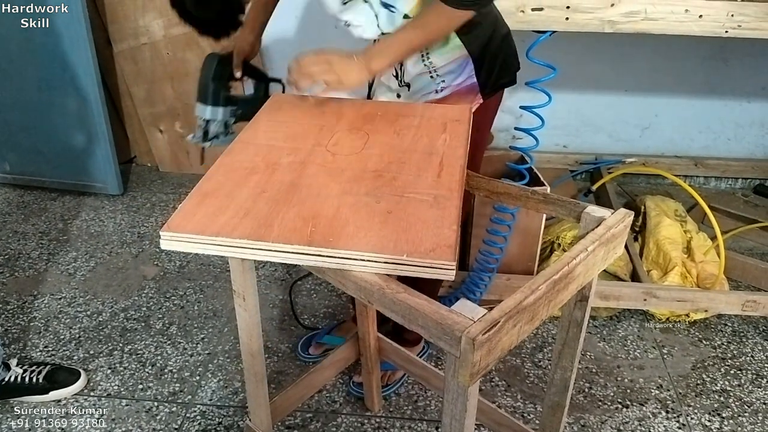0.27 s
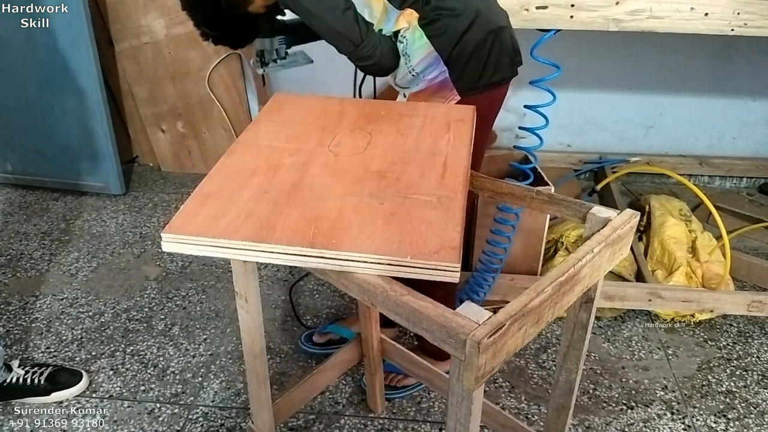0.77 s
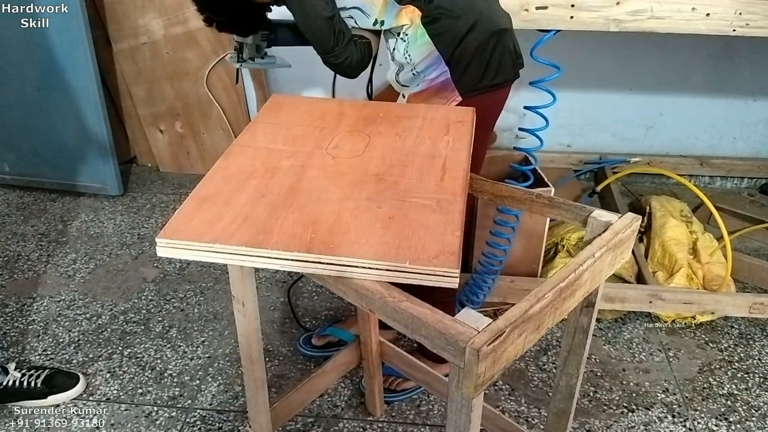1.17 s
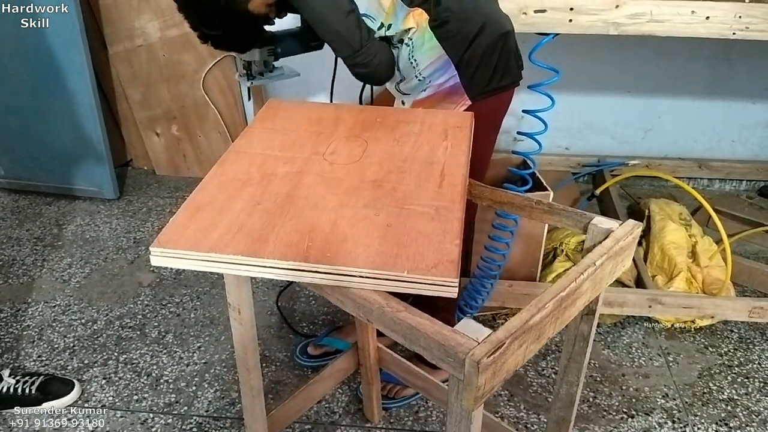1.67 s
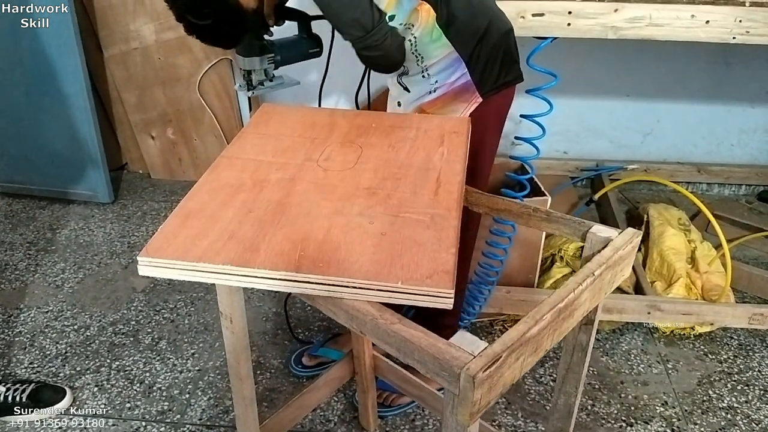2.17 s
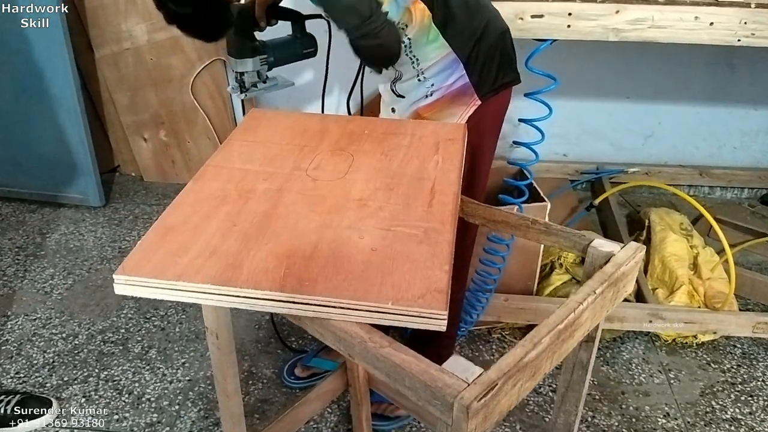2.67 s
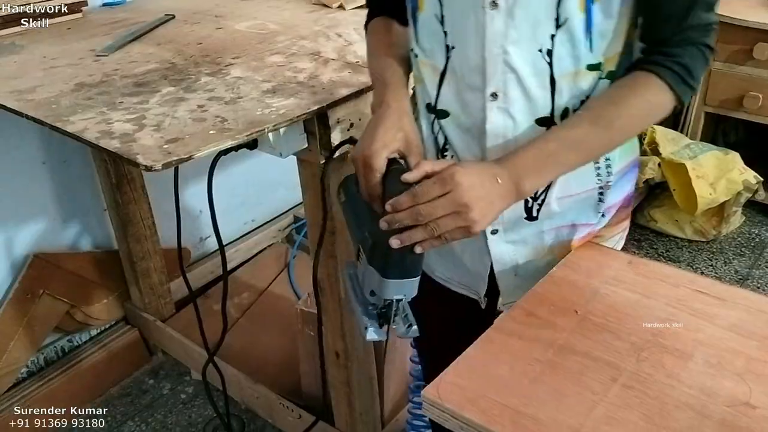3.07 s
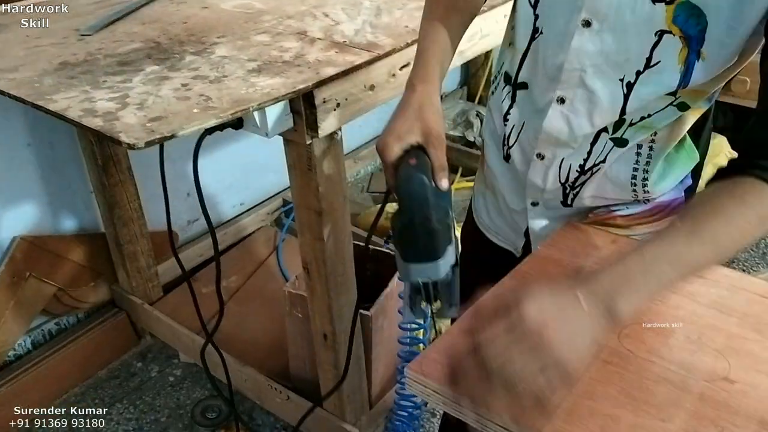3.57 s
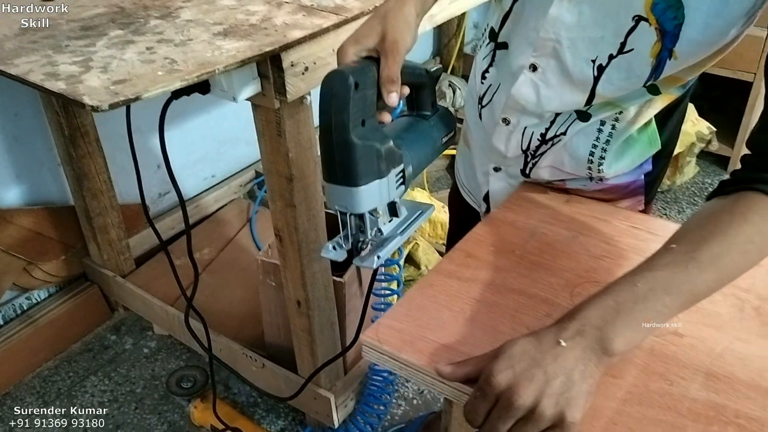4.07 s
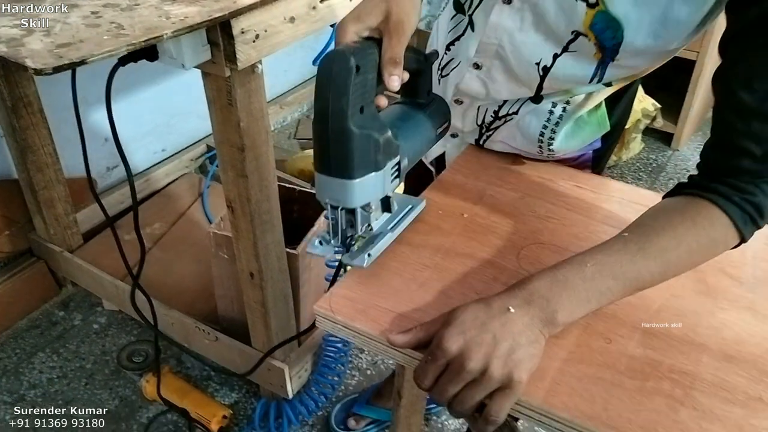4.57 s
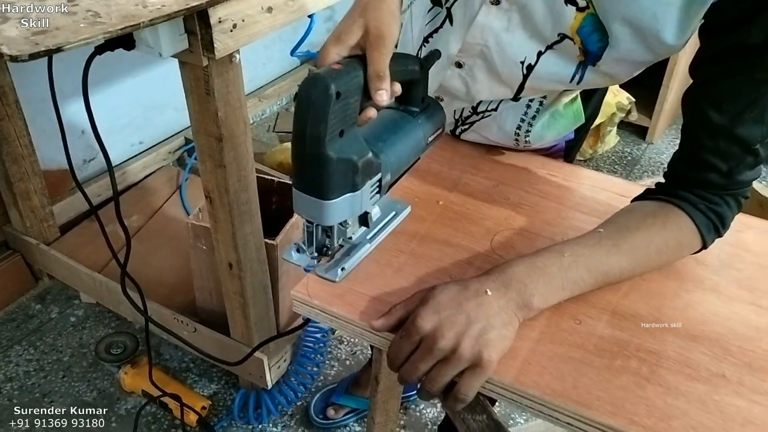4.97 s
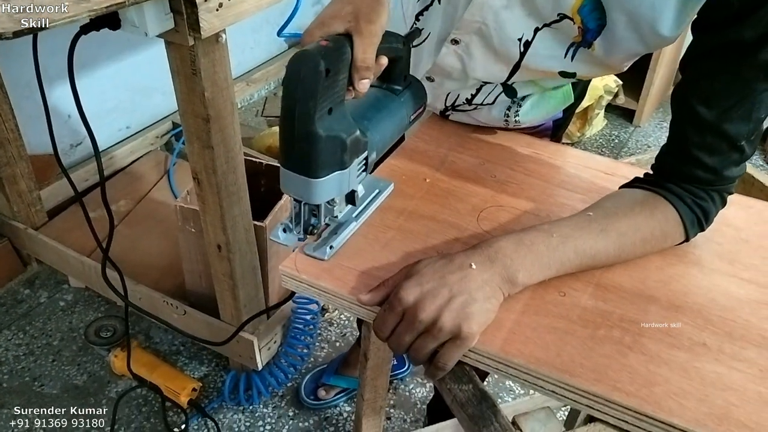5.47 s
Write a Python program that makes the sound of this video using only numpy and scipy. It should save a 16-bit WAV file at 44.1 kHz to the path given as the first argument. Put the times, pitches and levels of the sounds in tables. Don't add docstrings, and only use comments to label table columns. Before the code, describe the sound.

Distant machine hum and bench knocks, a short tool whir, then an electric jigsaw pulsed once and run up to a steady loud buzz.

```python
import sys
import numpy as np
from scipy import signal
from scipy.fft import rfft, irfft, next_fast_len
from scipy.io import wavfile
from scipy.ndimage import uniform_filter1d

SR = 44100
rng = np.random.default_rng(int(sys.argv[2]) if len(sys.argv) > 2 else 0)


def boost_factor(decibels):
    exponent = np.asarray(decibels, float) / 20
    return 10 ** exponent


def transcribe(signal):
    frames = np.atleast_2d(signal).T
    limited = np.clip(frames, -1, 1)
    pcm = np.round(limited * 32767).astype(np.int16)
    wavfile.write(sys.argv[1], SR, pcm)


N = 253134
TIME = np.arange(N) / SR

# f/Hz, density/dB per Hz
DRONE = [(24, -44), (40, -44.5), (81, -24.5), (163, -3.5), (251, -1.5), (337, 0.5), (377, -10.5), (413, -1),
         (506, -3.5), (580, -3), (977, 3), (1720, -6), (3890, -14.5), (5590, -36), (9000, -58.5),
         (11700, -99), (19800, -120)]
# f/Hz, width/Hz, level/dB
DRONE_RINGS = [(203, 48, -16.5), (354, 68, -12), (1032, 2.1, -19)]
# f/Hz, T60/s
HALL_T60 = [(150, 1.6), (500, 0.78), (1200, 1.1), (3000, 0.77), (6000, 0.27), (12000, 0.24)]
# f/Hz, left-right correlation/1
PORT_CORRELATION = [(60, 0.81), (130, 0.99), (290, 0.92), (640, 0.63), (1410, 0.058), (3100, 0.02),
                    (6820, 0.18), (15000, 0.067)]
# t/s, length/s, level/dB
GUSTS = [(.55, 0.044, -65), (1.148, 0.46, -78), (1.6, .25, -64.5), (1.966, 0.048, -49), (2.226, 0.042, -51),
         (2.422, 0.14, -55), (2.72, 0.039, -54), (3.012, 0.036, -90), (3.53, 0.68, -60.5),
         (4.33, 0.03, -58), (4.734, 0.043, -73.5), (5.133, 0.083, -45), (5.366, .04, -51),
         (5.515, 0.038, -42), (5.617, 0.032, -42)]
# t/s, peak/dB
TOUCHES = [
    (1.9955, -43.5),
    (2.01, -41.5),
    (2.036, -57.5),
    (5.7344, -39),
]
# t/s, peak/dB, ring f/Hz, lows/dB, treble/dB
KNOCKS = [(0.3465, -26.5, 1090, -6, -14), (0.5036, -21, 1470, 1, -3), (0.9102, -42, 1220, -25, -41),
          (1.186, -50.5, 1050, 5, -19), (1.226, -41.5, 1040, -2, -4.5), (1.4877, -34, 1020, -26, -19),
          (1.556, -20.5, 1170, 5.5, -8), (2.1063, -37.5, 3760, 14.5, 4.5), (2.459, -46, 980, -26, -8),
          (2.806, -42, 3800, -20, -10), (2.814, -27, 720, -11, -18), (3.869, -37, 190, 13, -40)]
# t/s, peak/dB, ring f/Hz, lows/dB, treble/dB
THUD = (-.03, -25, 700, 13, -40)
# f/Hz, width/Hz, level/dB
BENCH = [(1048, 120, -12), (1740, 51, -26.5), (2450, 290, -11.5), (3500, 100, -11.5), (4080, 150, -13.5),
         (5300, 260, -19)]
# t/s, attack/s, hold/s, release/s, level/dB, swell over the hold/dB
WHIRS = [
    (1.8, 0.099, 0.122, .01, -26.5, 1.5),
    (2.789, 0.046, 1.1, 0.043, -23.5, 3.5),
]
# f/Hz, width/Hz, level/dB
HOUSING = [(705, 154, -3), (2357, 150, -4), (2430, 830, 1.5), (2366, 15, -11), (3174, 170, -11),
           (3980, 330, -12.5), (4470, 1800, -8)]
# on/s, off/s, left minus right/dB
TRIGGER = [
    (2.803, 3.025, 1.5),
    (4.394, 9, -.5),
]
TONE_ORDERS = np.array([.7, 1, 2, 3, 4, 18, 36, 48, 54, 72])
# level over the air/dB, extra at full torque/dB, fade above f/Hz
TONES = [(-14, -8, 900), (-14, -8, 900), (-11, -8, 1500), (-4, -8, 1500), (-16, 0, 2000), (-25, 35, 4200),
         (-4, -22, 7400), (-5, 0, 16000), (-7, -24, 7800), (-22, -8, 7500)]
# f/Hz, density/dB per Hz
FAN_AIR = [(70, -42), (130, -50), (220, -18), (390, -5.5), (620, 4.5), (940, 4), (1730, 0), (2470, 3.5),
           (3100, 3), (3850, 8), (4500, 2.5), (5600, 3), (7000, 1.5), (16000, -7.5)]
# f/Hz, gain/dB
CASING = [(100, -50), (200, -16), (300, -11), (1100, -17), (1450, -2), (1850, -17), (2200, -5), (2600, -1),
          (3100, -9), (3800, -5), (4300, -5), (5500, 2), (8800, 2), (9400, -10), (10500, -14), (12000, 3),
          (13500, -9), (15000, -5)]
# f/Hz, width/Hz, level/dB, from shaft speed/Hz
CASE_RINGS = [(842, 5, -20, 255), (927, 3, -13, 294), (307, 2, -21, 285), (215, 2, -24, 285)]
# f/Hz, gain/dB
HUM_NEAR = [(1100, 5), (1400, 0)]
# f/Hz, gain/dB
MIC = [(40, -18), (140, -1.5), (6000, -1.5), (6500, -11), (7200, -7.5), (8000, -20.5), (9500, -27),
       (10800, -31.5), (12000, -25), (13000, -30.5), (15700, -30)]
# f/Hz, left minus right/dB
PORTS = [(110, 0), (250, 1.5), (700, 0.5), (1300, 2.5), (2400, 3.5), (4400, -6), (8000, -2.5), (15000, 1)]

DRONE_DB, BED_DB = -37, 6
DUCK_DB, DUCK_S, DUCK_FROM_DB = -1, .1, -17
RUMBLE_DB, RUMBLE_WALK_DB, GUST_EDGE_S = -74, 5, 0.018
LEAD = SR // 8
SMALL_HZ = 2000
MIDS_DB, MIDS_PER_TREBLE = -2.5, 0.071
FULL_HZ, QUICK_HZ, QUICK_S, SLOW_S = 308, 134, .045, .213
DRAG_S, FRICTION_HZ = 1.24, 30
AIR_DB, AIR_DB_PER_OCT, POWER_DB, SWITCH_S = -29, 1.5, 3.5, 0.015
DARK_DB_PER_OCT, SIZZLE_DB_PER_OCT = 1, 4
TORQUE_DARK_DB = 5
WHINE_FROM_HZ = 112
TONE_ROOM_DB = -8
COAST_TONE_DB, COAST_HUM_DB = -1, -10
FADE_IN_S = .006


def level(x, db):
    return x * boost_factor(db) / np.sqrt(np.mean(x ** 2))


def at(points, hz):
    f, v = np.transpose(points)
    return np.interp(np.log(np.maximum(hz, 1)), np.log(f), v)


def colour(x, points, share=1):
    size = x.shape[-1]
    n = next_fast_len(size + SR // 20, real=True)
    gain_db = share * at(points, np.arange(n // 2 + 1) * SR / n)
    return irfft(rfft(x, n) * boost_factor(gain_db), n)[..., :size]


def ring(x, hz, width_hz):
    return signal.lfilter(*signal.iirpeak(hz, hz / width_hz, SR), x)


def walk(rate_hz):
    k = int(SR / rate_hz)
    held = np.repeat(rng.standard_normal(N // k + 1), k)
    return 0.76 * uniform_filter1d(uniform_filter1d(held, k), k)[:N]


def grit(per_s, scatter_db):
    chance = rng.random((2, N))
    size = boost_factor(-scatter_db * np.log(chance[1])) * rng.standard_normal(N)
    return level((chance[0] < per_s / SR) * size, 0)


def burst(s, attack_s, hold_s, release_s, db, swell_db):
    corners_s = np.cumsum([s, attack_s, hold_s, release_s])
    corners_db = [db - 25.5, db, db + swell_db, db - 19.5]
    return boost_factor(np.interp(TIME, corners_s, corners_db, left=-99, right=-99))


def octaves(noise, gain):
    edge = [(.5, -40), (.62, -14), (.707, -6), (.81, -2), (1, 0), (1.24, -2), (1.414, -6), (1.62, -14), (2, -40)]
    size = noise.shape[-1]
    n = next_fast_len(size, real=True)
    bins, f = rfft(noise, n), np.arange(n // 2 + 1) * SR / n
    out = 0
    for hz in 62. * 2 ** np.arange(9):
        band = irfft(bins * boost_factor(at(edge * np.array([hz, 1]), f)), n)[:, :size]
        out = out + gain(hz) * band
    return out


def diffuse(size):
    like = np.clip(at(PORT_CORRELATION, np.arange(size // 2 + 1) * SR / size), 0, 1)
    mid, side = rfft(rng.standard_normal((2, size))) * np.sqrt([1 + like, 1 - like])
    return irfft(np.array([mid + side, mid - side]), size) / np.sqrt(2)


def direct(x):
    return np.array([np.pad(x[0], (3, 0))[:-3], x[1]])


def hall(x, direct_db, count):
    size = x.shape[1]
    t, out = np.arange(SR) / SR, 0
    for k in range(count):
        tail = octaves(diffuse(SR), lambda hz: boost_factor(-60 * t / at(HALL_T60, hz)))
        tail = tail * np.minimum(t / 0.0072, 1)
        tail = tail / np.sqrt(np.sum(tail ** 2) / 2)
        phase = (np.arange(size) / SR * 6 + k / count) % 1
        turn = np.cos(np.pi * (phase - .5)) * np.sqrt(2 / count)
        out = out + signal.oaconvolve(x * turn, tail, axes=1)[:, :size]
    return out + boost_factor(direct_db) * direct(x)


def drone(loud):
    noise = diffuse(N)
    bed = octaves(noise, lambda hz: boost_factor(1.3 * walk(6)))
    bed = level(colour(bed, DRONE), DRONE_DB)
    rings = sum(level(ring(noise, hz, w), db) for hz, w, db in DRONE_RINGS)
    power = np.mean(loud ** 2, axis=0)
    heard = np.sqrt(uniform_filter1d(power, int(DUCK_S * SR)) + 1e-12)
    duck_db = DUCK_DB * np.tanh(heard / boost_factor(DUCK_FROM_DB)) ** 2
    return (bed + rings * boost_factor(DRONE_DB)) * boost_factor(BED_DB - duck_db)


def handling():
    noise = rng.standard_normal((2, N)) + .6 * rng.standard_normal(N)
    rumble = level(colour(noise, [(12, -28), (30, -10.5), (60, -8.5), (100, -4.0), (200, -69.5)]), 0)
    gain = boost_factor(RUMBLE_DB + RUMBLE_WALK_DB * walk(2.9))
    for s, hold_s, db in GUSTS:
        gain = gain + burst(s - GUST_EDGE_S, GUST_EDGE_S, hold_s, GUST_EDGE_S, db, 0)
    ticks, t = np.zeros((2, N + 400)), np.arange(400) / SR
    for s, db in TOUCHES:
        start = int(s * SR)
        ticks[:, start:start + 400] += rng.standard_normal((2, 400)) * np.exp(-t / .003) * boost_factor(db + 7.5)
    return rumble * gain + ticks[:, :N]


def knocks():
    dry, t = np.zeros(N + LEAD), np.arange(-LEAD // 4, LEAD) / SR
    for s, db, hz, low_db, top_db in [THUD, *KNOCKS]:
        big = hz < SMALL_HZ
        decay = np.exp(-t / (.016 if big else .006))
        crack = rng.standard_normal(len(t)) * decay * np.clip(t / .0015, 0, 1)
        rings = level(ring(crack, hz, 260), -12 if big else 1)
        rings = rings + level(ring(crack, hz * 2.2, 260), -18.5)
        if big:
            rings = rings + sum(level(ring(crack, f, w), g) for f, w, g in BENCH)
        mids_db = MIDS_DB + MIDS_PER_TREBLE * top_db
        shape = [(50, low_db - 59.5), (120, low_db - 6.0), (500, low_db - 5.0), (1300, 0.015),
                 (3000, mids_db), (6000, top_db), (12000, top_db - 17.0)]
        start = int(s * SR) + 3 * LEAD // 4
        dry[start:start + len(t)] += colour(level(crack, 0) + rings, shape) * boost_factor(db - 3.0)
    return hall(np.tile(dry, (2, 1)), 0.38, count=2)[:, LEAD:]


def gears():
    taps = grit(3000, 2.0) * boost_factor(2.5 * walk(18))
    body = sum(boost_factor(db) * level(ring(ring(taps, hz, w), hz, w), 0) for hz, w, db in HOUSING)
    return body * boost_factor(-2.5) * sum(burst(*row) for row in WHIRS)


def armature():
    shaft_hz, power, pan_db = np.full(N, 8.), np.zeros(N), np.zeros(N)
    for on, off, side_db in TRIGGER:
        held = np.clip(TIME - on, 0, off - on)
        quick_lag = QUICK_HZ * np.exp(-held / QUICK_S)
        slow_lag = (FULL_HZ - QUICK_HZ) * np.exp(-held / SLOW_S)
        run = FULL_HZ - quick_lag - slow_lag
        coast = (run + FRICTION_HZ) * np.exp(-np.maximum(TIME - off, 0) / DRAG_S) - FRICTION_HZ
        shaft_hz = np.maximum(shaft_hz, coast)
        power = power + (TIME > on) * (TIME < off)
        pan_db = np.where(TIME > on, side_db, pan_db)
    return shaft_hz, uniform_filter1d(power, int(SWITCH_S * SR)), pan_db


def fan_air(taps, turns, slow_oct, dark_db):
    stroke = 1 + 0.16 * np.cos(2 * np.pi * turns / 7)
    air = colour(rng.standard_normal(N) * stroke + 0.84 * taps, FAN_AIR)
    low = colour(air, [(2500, 0), (6000, -30), (12000, -50)])
    air = low + (air - low) * boost_factor(-np.maximum(dark_db, 0))
    dull = colour(air, [(7500, 0), (10000, -40)])
    return dull + (air - dull) * boost_factor(-SIZZLE_DB_PER_OCT * slow_oct)


def shaft_tones(shaft_hz, turns, torque, power):
    tones, shudder = 0, 2.8 * torque * walk(400)
    for order, (db, pull_db, top_hz) in zip(TONE_ORDERS, TONES):
        hz = order * shaft_hz
        fade_db = 60 * np.log2(np.maximum(hz / top_hz, 1))
        if order > 30:
            fade_db = fade_db + 60 * np.log2(np.maximum(WHINE_FROM_HZ / shaft_hz, 1))
        steady_db, coast_db = (1.5, COAST_HUM_DB) if order < 5 else (5, COAST_TONE_DB)
        flutter_db = steady_db * (1 - torque) * walk(20) + 8 * torque * walk(250)
        flutter_db = flutter_db + coast_db * (1 - power)
        gain = boost_factor(db + pull_db * torque + at(CASING, hz) - fade_db + flutter_db)
        tones = tones + gain * np.sin(2 * np.pi * order * turns + shudder)
    return tones


def motor():
    shaft_hz, power, pan_db = armature()
    slow_oct = np.log2(FULL_HZ / shaft_hz)
    torque = np.clip(uniform_filter1d(np.gradient(shaft_hz) * SR, size=450) / 1100, 0, 1)
    turns = np.cumsum(shaft_hz * (1 + 0.0012 * walk(60))) / SR
    air_db = AIR_DB - AIR_DB_PER_OCT * slow_oct + POWER_DB * power
    dark_db = DARK_DB_PER_OCT * slow_oct ** 3.77 * (1 - .25 * power) + TORQUE_DARK_DB * torque
    taps = grit(3000, 0.31)
    air = fan_air(taps, turns, slow_oct, dark_db)
    tones = shaft_tones(shaft_hz, turns, torque, power)
    hum = 0
    for hz, w, db, from_hz in CASE_RINGS:
        hum = hum + level(ring(taps, hz, w), db) * np.clip((shaft_hz - from_hz) / 8, 0, 1)
    since_on = TIME - TRIGGER[0][0]
    on = boost_factor(air_db + 10.5) * np.clip(since_on / SWITCH_S, 0, 1) ** 2
    on = on * boost_factor(np.array([pan_db, -pan_db]) / 2)
    return air * on, (tones * np.clip(since_on / .06, 0, 1) ** 2 + hum) * on


def saw():
    (air, tones), other = motor(), gears()
    into_hall = air + boost_factor(TONE_ROOM_DB) * colour(tones, HUM_NEAR, -1.4) + other * boost_factor(-4)
    near = hall(into_hall, -1.73, count=6)
    near = near + direct(colour(tones, HUM_NEAR)) * boost_factor(-6)
    near = near + direct(np.tile(other, (2, 1))) * boost_factor(-3.5)
    jump = (TIME > sum(WHIRS[0][:3])) & (TIME < TRIGGER[0][0])
    return near * uniform_filter1d(1. - jump, size=60)


def scene():
    loud = np.tanh(.9 * (saw() + knocks())) / .9
    return colour(loud + drone(loud), MIC) + handling()


def top_cut(x):
    return signal.sosfilt(signal.butter(12, 15730, fs=SR, output="sos"), x)


def record(dry):
    ports = np.array([colour(dry[0], PORTS, 1 / 2), colour(dry[1], PORTS, -1 / 2)])
    return top_cut(ports * np.minimum(TIME / FADE_IN_S, 1))


dry = scene()
out = record(dry)
transcribe(out)
```